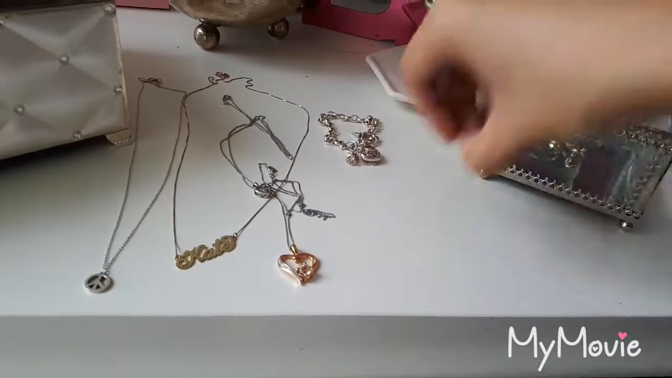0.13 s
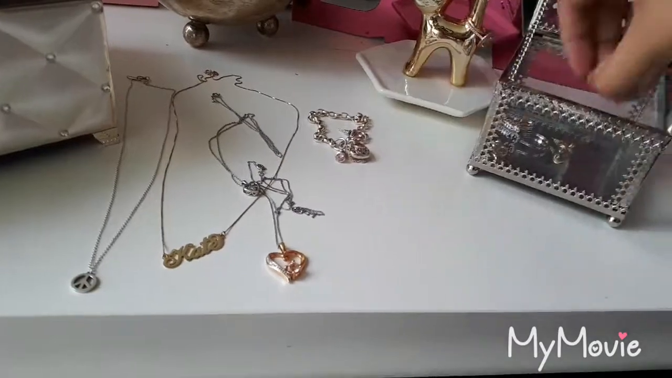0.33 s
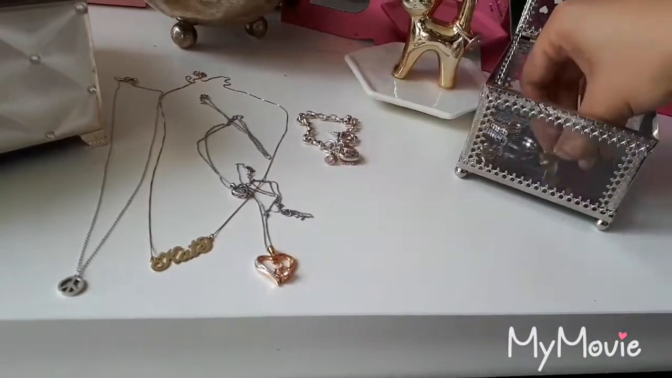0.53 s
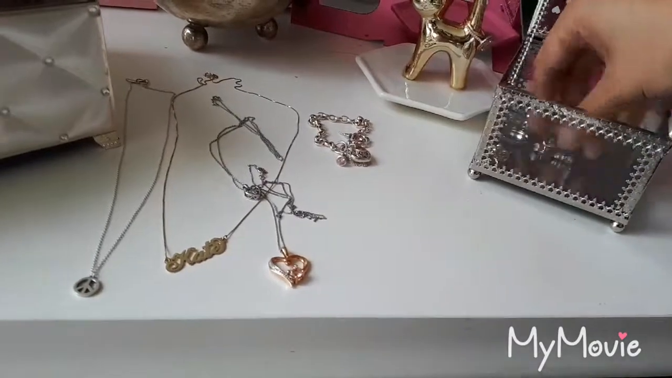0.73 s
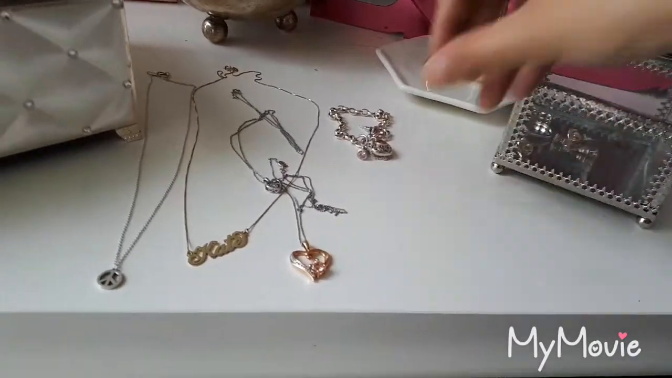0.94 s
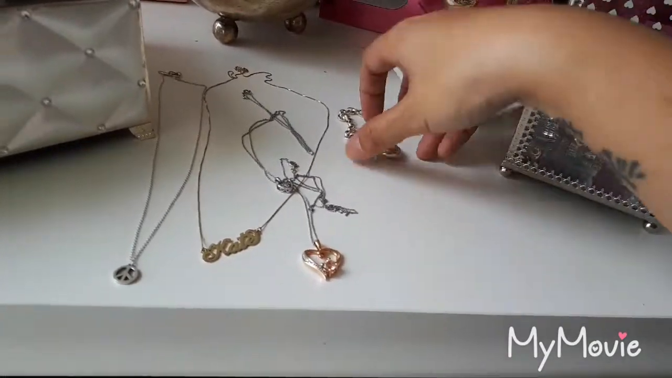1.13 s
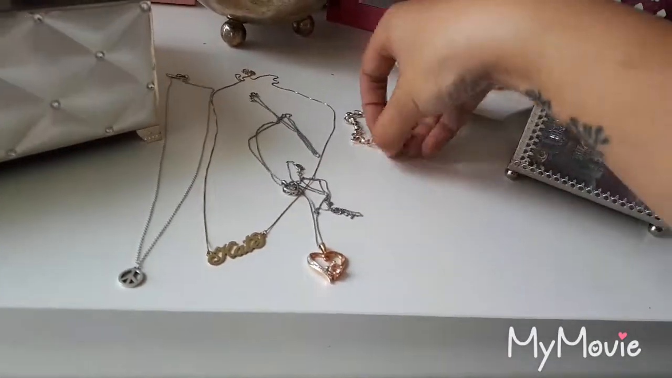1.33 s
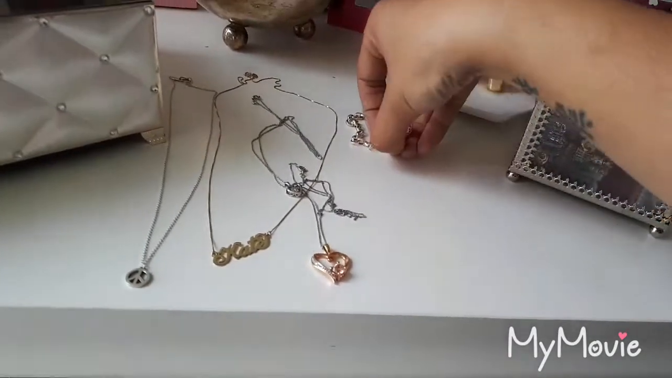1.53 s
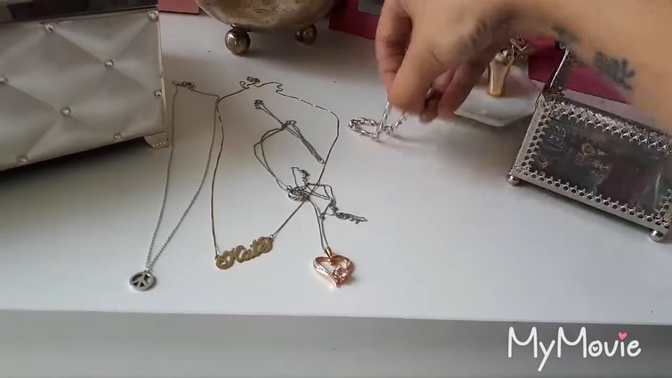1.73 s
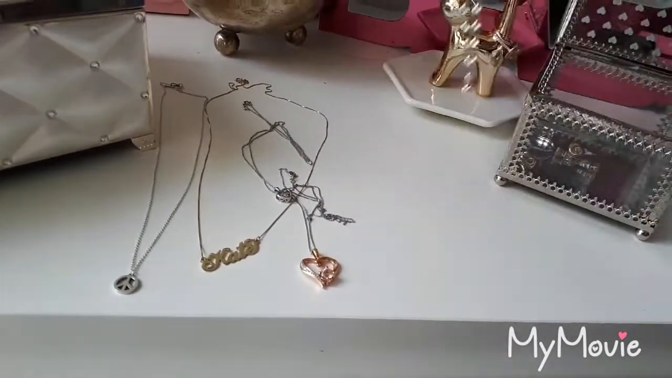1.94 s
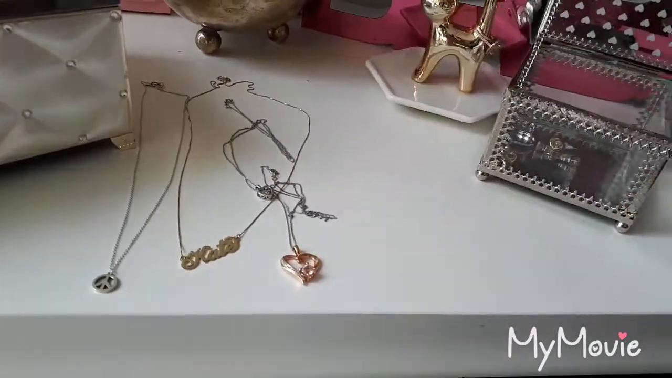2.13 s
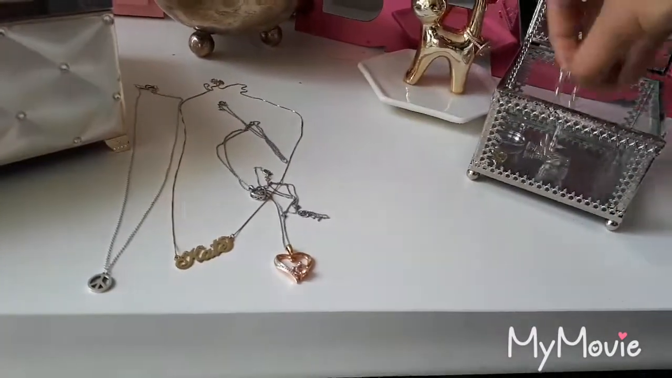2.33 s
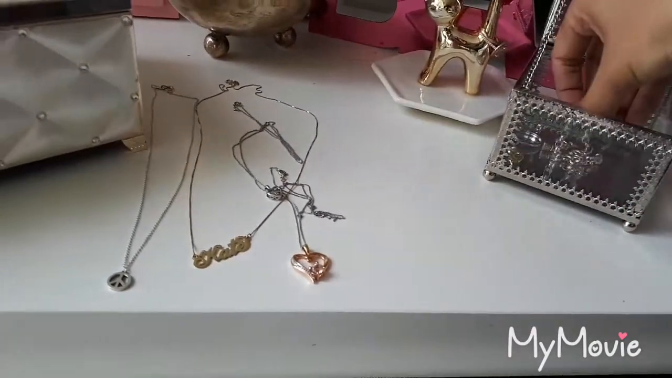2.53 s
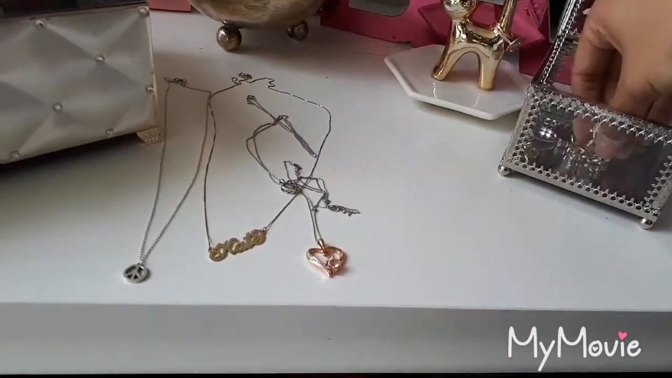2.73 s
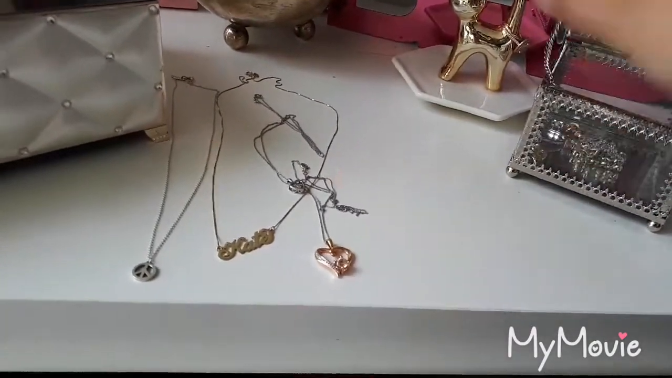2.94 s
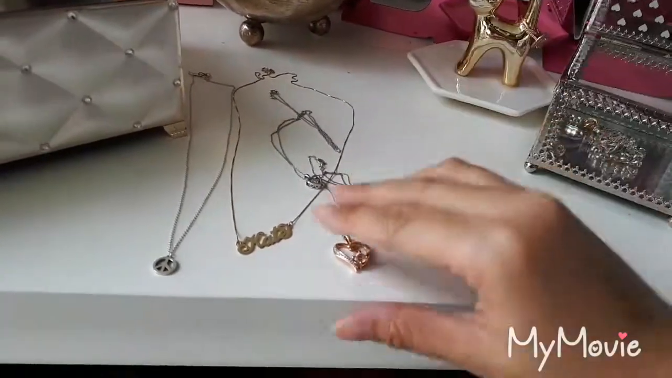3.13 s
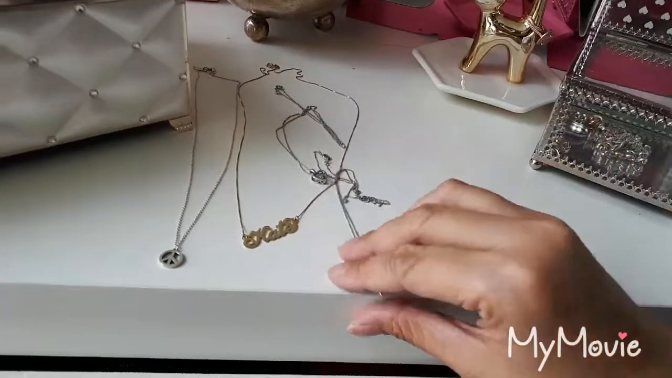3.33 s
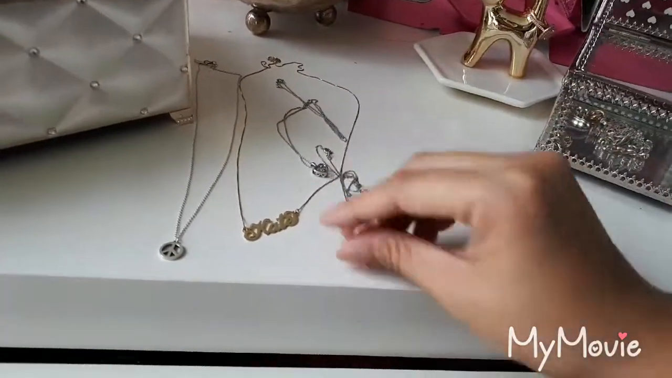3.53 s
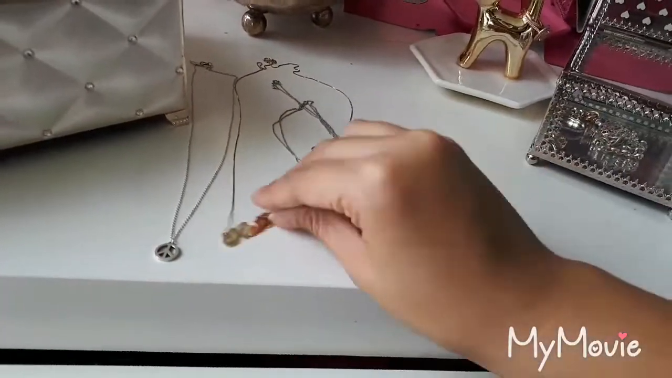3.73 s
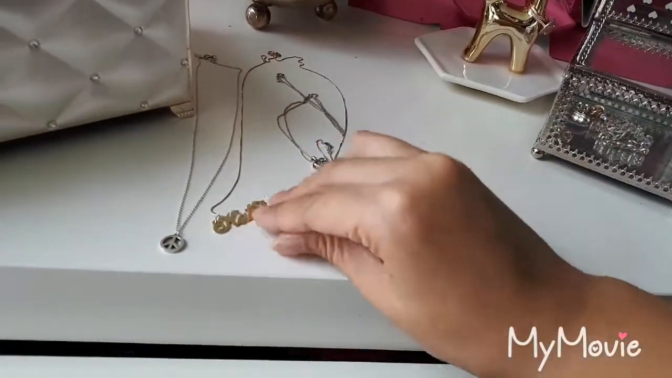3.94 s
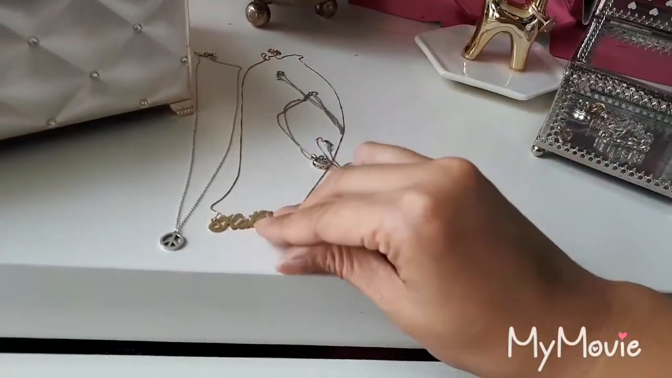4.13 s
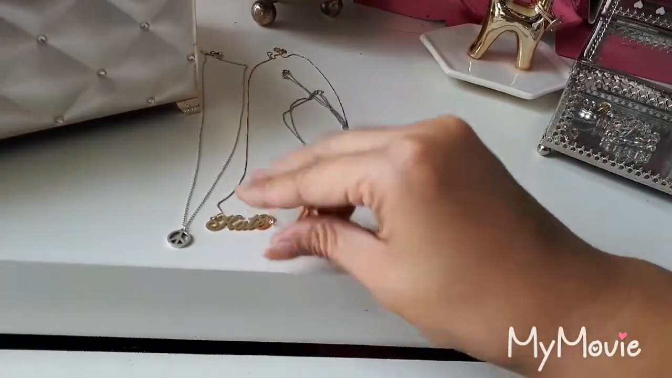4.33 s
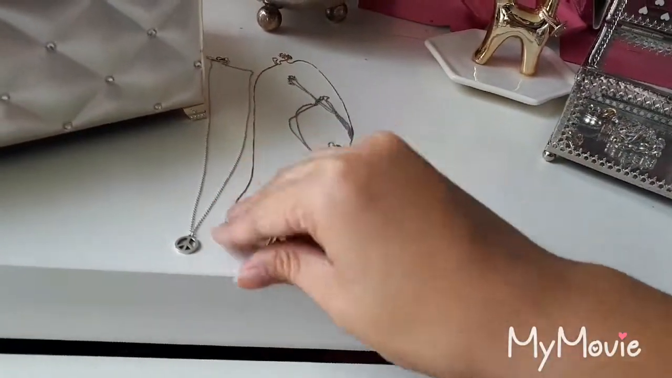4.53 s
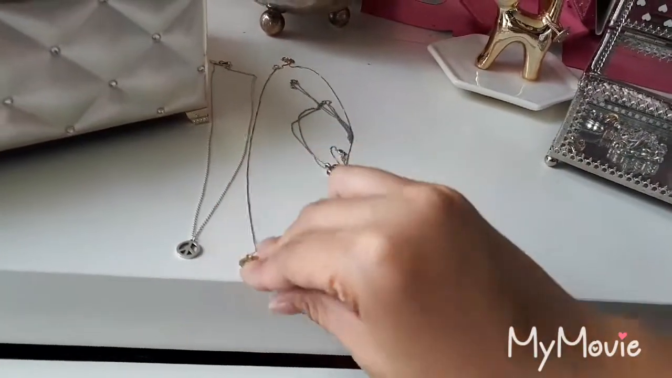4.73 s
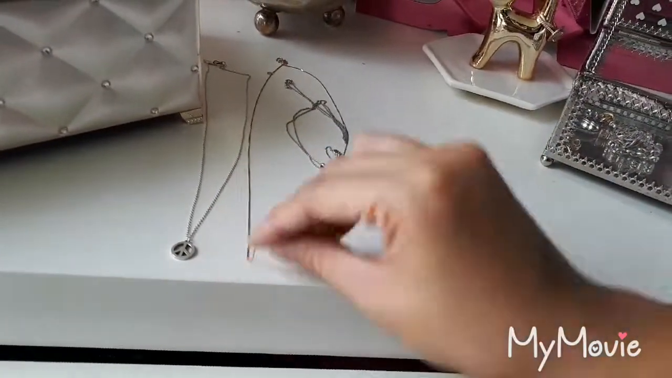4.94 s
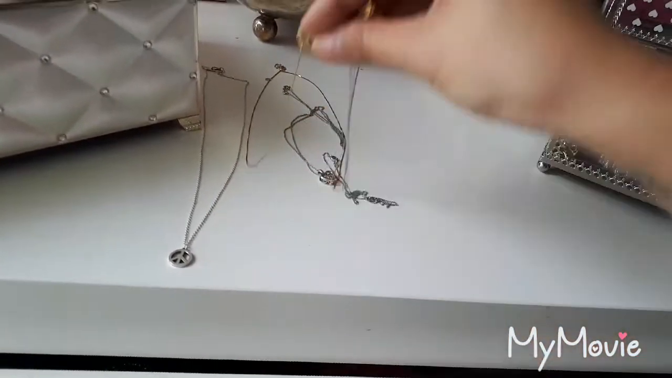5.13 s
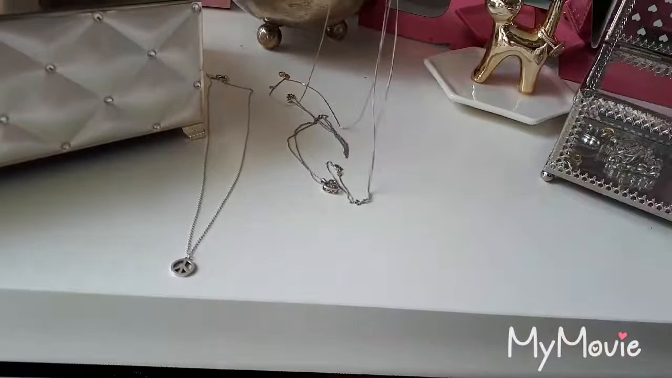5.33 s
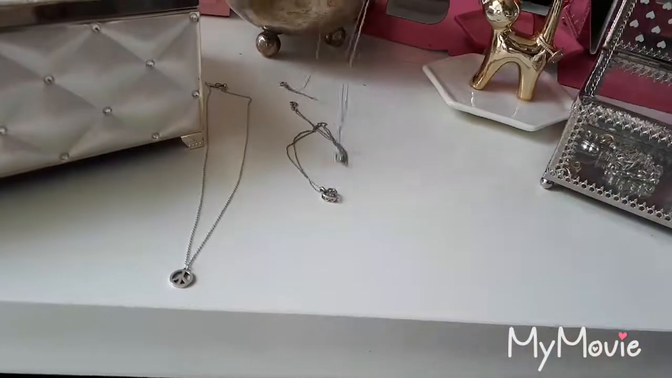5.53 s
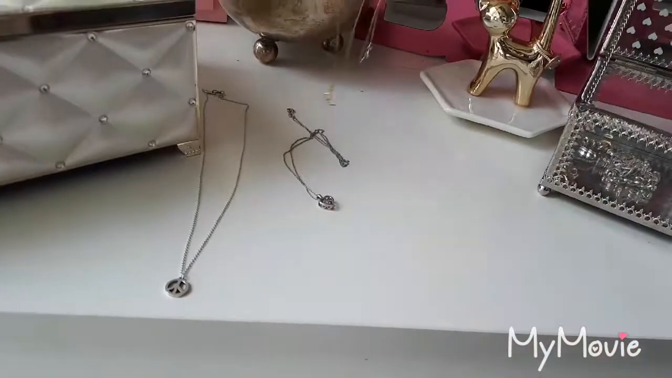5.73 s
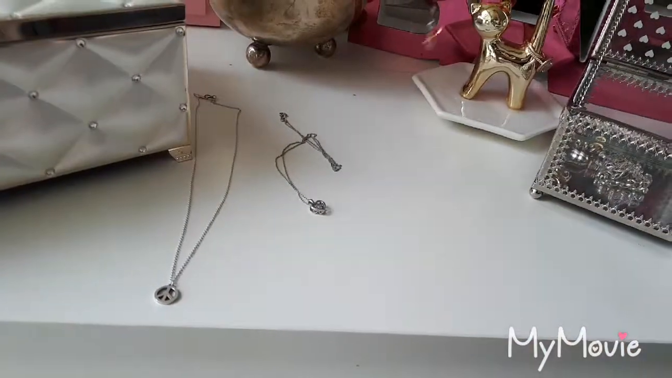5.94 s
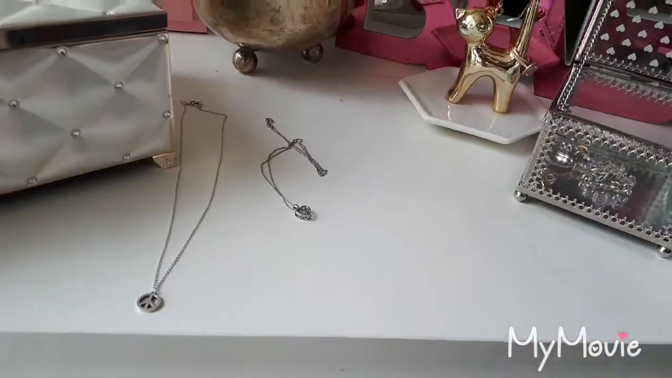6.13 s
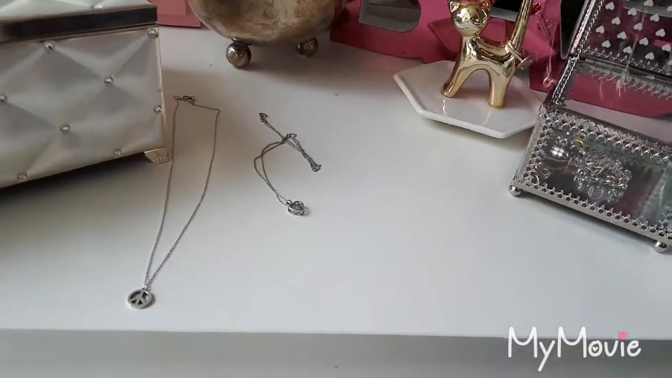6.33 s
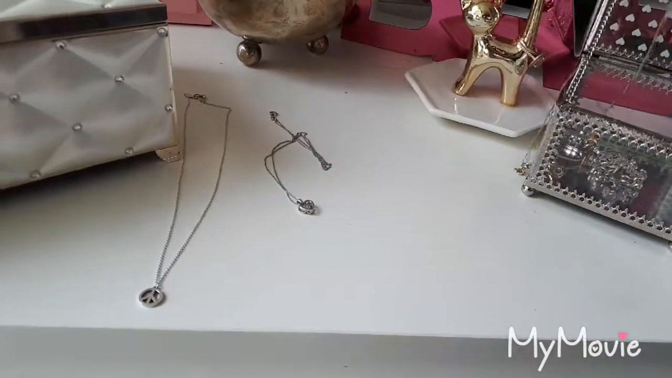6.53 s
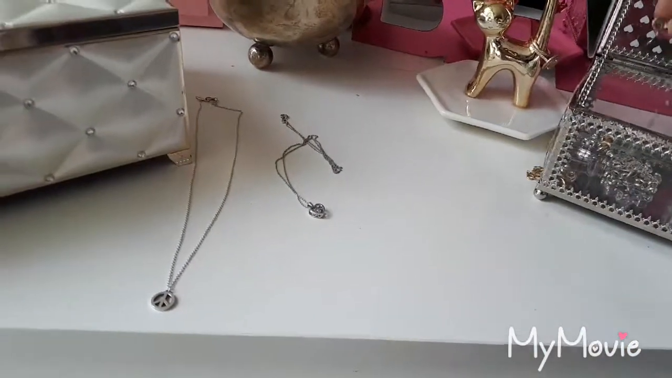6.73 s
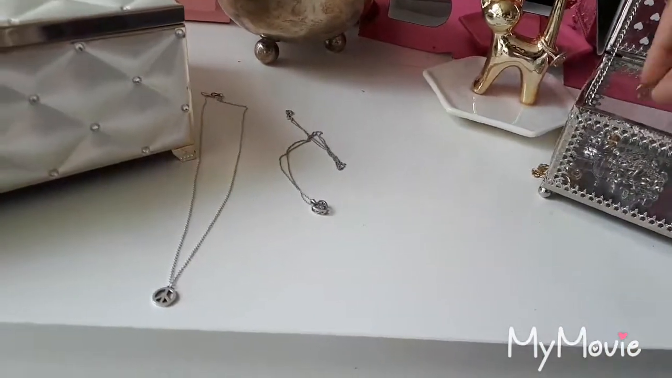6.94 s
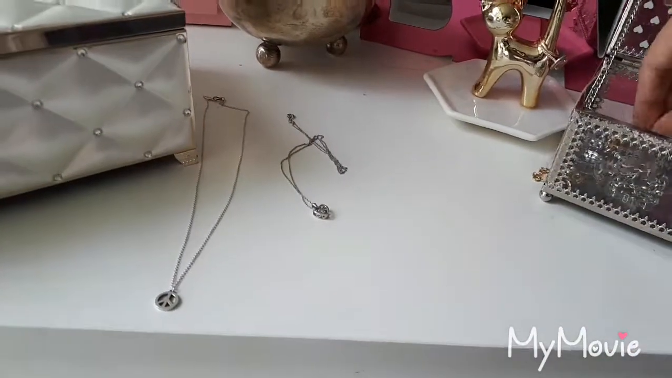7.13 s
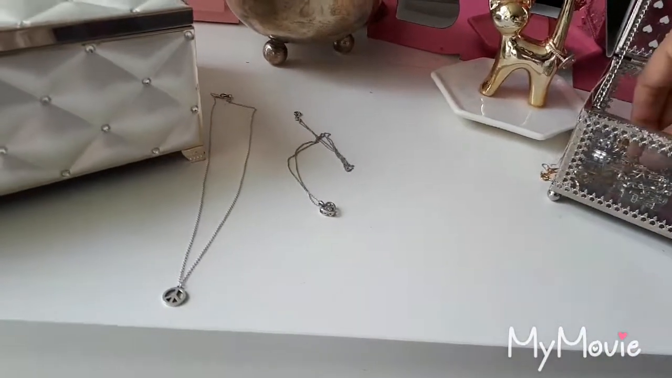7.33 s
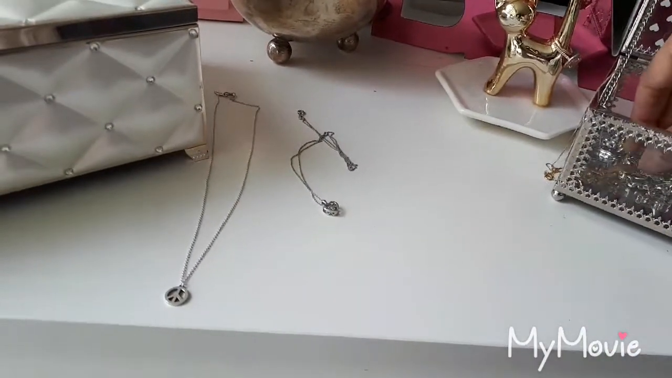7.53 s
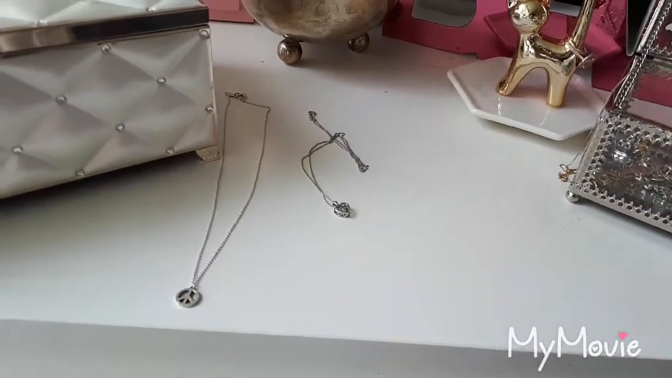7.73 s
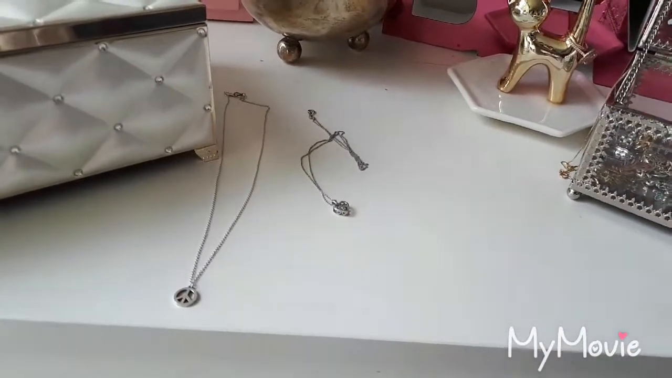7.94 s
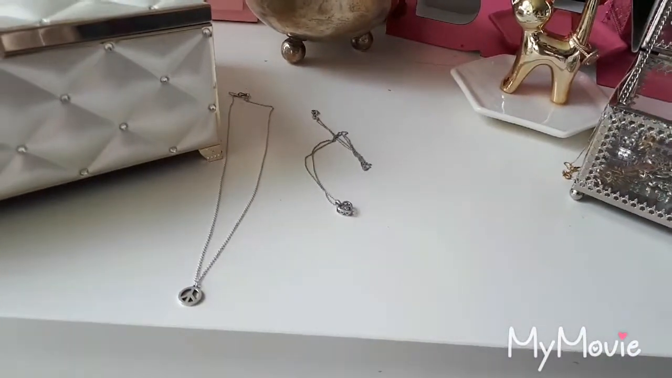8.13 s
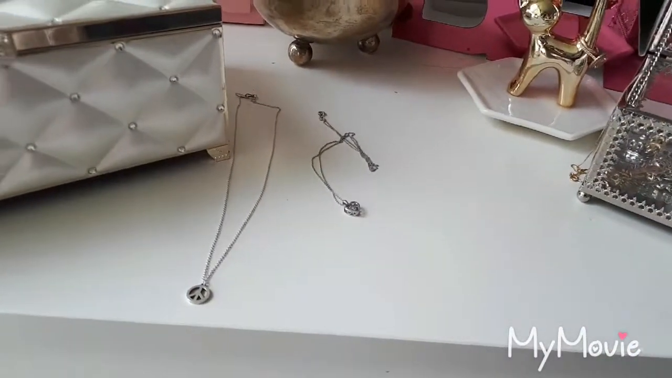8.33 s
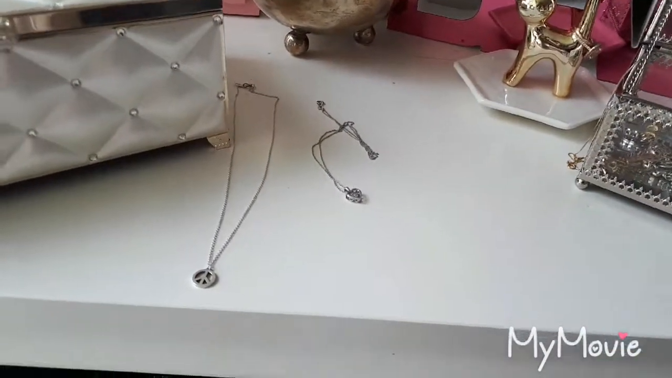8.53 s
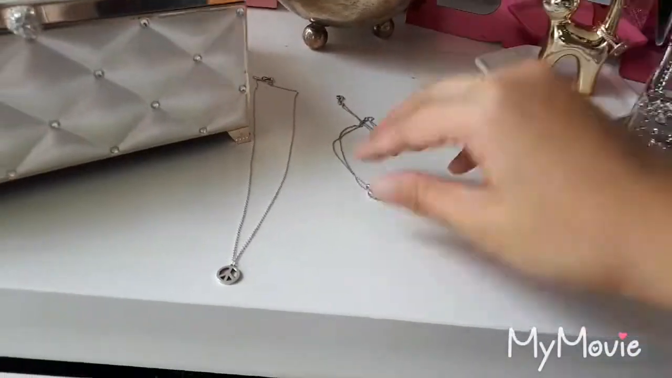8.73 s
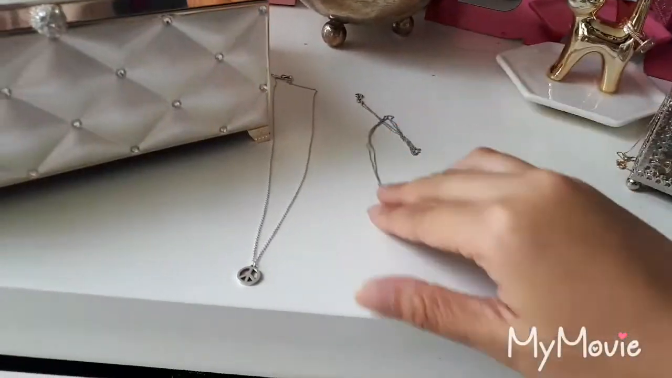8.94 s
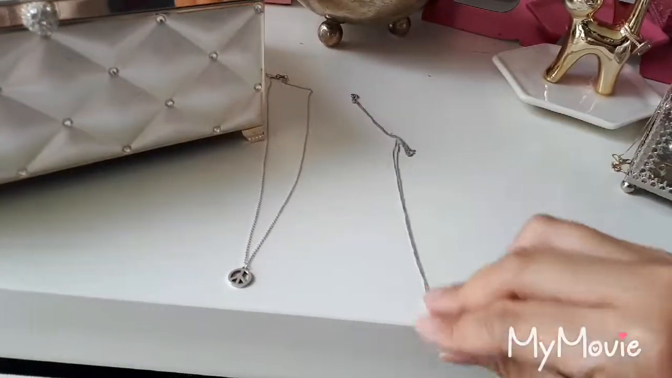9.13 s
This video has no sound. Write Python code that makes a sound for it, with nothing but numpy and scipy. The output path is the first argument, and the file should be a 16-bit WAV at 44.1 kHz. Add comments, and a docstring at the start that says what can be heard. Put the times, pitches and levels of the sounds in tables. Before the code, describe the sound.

A quiet small room with low rushing air and a faint wavering fan hum, picked up closely by a small microphone without deep bass. After a barely audible chain whisper, small pieces clink sharply on a glass and metal box at 0.7-1.0 s, with weaker ticks to 1.3. A bracelet scrapes the table at 1.3-1.5, and dry metal ticks follow around 1.9. At 2.45-3.05 a denser load rattles and jingles into the box. A dull hand thump on the table board, the strongest low sound, comes at 3.3. From 3.4 to 5.0 a necklace drags very softly with sparse ticks; a hanging chain's whisper swells from 5.2 to 5.75. Small links tick at 6.5-6.7, then a third load clinks at 7.2-7.75. A tiny rising squeak at 8.35 is nearly hidden. At 9.0 a tick and a fine chain scrape, swelling to the end.

```python
"""At a dressing table in a small room, a faintly whispering chain opens; then jewelry is lowered into a box.
First pieces ring its glass and metal modes, a bracelet scrapes the table, and a second, denser load lands.
A hand thumps the board, a necklace drags as filtered link collisions, and a hanging chain swells in a whisper.
A third load clinks, a faint squeak rises, and a fine chain scrapes last. Through it all there is air and fan hum;
shaped noise echoes give each sound a short tail, and a small microphone leaves out the deep bass."""
import sys
import numpy as np
from scipy import signal
from scipy.fft import rfft, irfft
from scipy.io import wavfile
from scipy.ndimage import uniform_filter1d, map_coordinates

SR = 44100
rng = np.random.default_rng(int(sys.argv[2]) if len(sys.argv) > 2 else 0)


def dump_mix(stems):
    """Bounce the given channels to the path in sys.argv[1] as a 16-bit WAV at rate SR."""
    frames = np.atleast_2d(stems).T  # one column per channel
    limited = np.clip(frames, -1, 1)  # hard clip at full scale
    pcm = np.round(limited * 32767).astype(np.int16)
    wavfile.write(sys.argv[1], SR, pcm)


N = 408807
TIME = np.arange(N) / SR  # s

# In the event tables, levels are relative: each source adds its own trim, level_db.

# Pieces landing in the box:
# (time [s], level [dB], low clunk against clink [dB], top-treble sparkle against clink [dB])
BOX_LANDINGS = [(0.713, -56.5, 4, -12), (0.7317, -24, -1, -10), (0.7519, -33, 0, -10),
                (0.7704, -34, 0, -1.5), (0.8203, -31.5, -2.5, -3.5), (0.8424, -37, -4.5, -5),
                (0.8698, -30, -24, -10), (0.9018, -36, -15, -7), (0.9815, -52, -6, -13),
                (1.0267, -44, -12, -10.5), (1.0451, -49, -9, -10), (1.1152, -48, -10.5, -9),
                (1.2072, -56, -3, -11), (1.2795, -53, -8, -17), (2.4606, -29, -1.5, -2),
                (2.4722, -26, -8, -9), (2.4895, -26, -7, -14), (2.5041, -26, -5.5, -8),
                (2.5185, -25, -6, -7), (2.5499, -28, -5.5, -3), (2.5621, -30, -4, -4),
                (2.592, -25, -13, -8), (2.6034, -29.5, -4.5, -7), (2.6579, -36, -6.5, -9),
                (2.7189, -31, -5, -4), (2.7492, -28, -1, -5.5), (2.8767, -33.5, -6, -8),
                (2.927, -33.5, -8, -8), (2.9554, -32, -3, -7), (2.9887, -24, -10, -10),
                (3.0003, -28, 1, -15), (3.0201, -27.5, -9.5, -5.5), (7.1996, -31.5, -9, -10),
                (7.2136, -33.5, -5.5, -8), (7.2526, -36.5, 1, -5), (7.3137, -44, 4, -6),
                (7.4279, -46, 1.5, 0), (7.6028, -49, -2, -12), (7.6374, -27, 3, -7.5),
                (7.724, -30.5, -2.5, -1)]
# Glass panes and metal frame of the box, before each hit's scatter: (frequency [Hz], energy [dB], t60 [s])
BOX_MODES = [(384, -10, .035), (490, -13, 0.012), (1108, -12, 0.09), (1477, -5.5, 0.039),
             (1690, -4.5, 0.017), (1917, -3.5, 0.021), (2025, -1.5, 0.026), (2160, -4.5, 0.032),
             (2300, -3.5, 0.049), (2470, -6.5, .018), (3688, -10.5, 0.0097), (3990, -1.5, .015),
             (4110, 1.5, .015), (4340, -4, 0.011), (5050, -15.5, 0.011), (6140, -6, 0.025),
             (6730, -4, .013), (7010, -1, 0.02), (7100, -2, .02), (7400, 2, 0.024), (7930, -6.5, 0.0095),
             (8100, -5.5, 0.016), (9600, 0, 0.02), (11640, -4.5, 0.006), (12150, -8, 0.011),
             (12500, -7, 0.01), (14520, -10, 0.0063)]
# Hard metal contact: (frequency [Hz], spectrum level [dB per Hz])
METAL_CONTACT = [(150, -13), (380, -2), (850, -16.5), (1120, -1.5), (2300, -1.5), (3300, -7.5),
                 (4600, -7.5), (5800, -1.5), (7500, 2.5), (8900, -6), (12000, -4.5), (15000, -7.5),
                 (16500, -30)]


def box_clinks(level_db=-.5, crack_db=-3, own_db=-8, spread_db=3.5, detune=.013, buzz_t60=.015):
    """Each landing cracks on the glass and rings both the box and the piece itself."""
    out = np.zeros(N)
    contact = click(METAL_CONTACT)
    pile_hits = stray_hits(CHAIN_PILES, gap_s=.02, above_db=6, weight_db=-5, sparkle_db=-8)
    for s, db, *colour in BOX_LANDINGS + pile_hits:
        box_ring = modes(BOX_MODES, spread_db, detune)
        piece_ring = gain_of(own_db) * trinket(t60=0.021)
        crack = gain_of(crack_db) * ring(chatter(buzz_t60), contact)
        clink = strike(box_ring + piece_ring + crack, registers(db + level_db, *colour))
        contacts = touches(s, BOX_LANDINGS, lead_s=.004, lead_db=-17, bounce_s=.008, bounce_db=-15)
        for at, touch_db in contacts:
            add(out, at, gain_of(touch_db) * clink)
    return out


# A chain piling up in the box: (start [s], length [s], level [dB], swell from start to end [dB])
CHAIN_PILES = [(.668, .05, -70, 2.5), (.735, 0.13, -53, -9), (.88, .11, -65, -12), (1.1, .18, -77, 6),
               (2.462, 0.13, -38, -6), (2.72, 0.037, -36.5, 0), (2.785, .12, -48, -3),
               (2.94, 0.083, -40.5, -0.5), (7.2, .085, -52, 0), (7.42, 0.029, -57, 1.5),
               (7.54, .17, -65.5, 10)]


def piling(level_db=-1, per_s=700, size_db=4, dry_db=-4, count=6):
    """As a chain settles, links rain onto several spots of the box and onto each other."""
    on_box = 0
    for _ in range(count):
        spot = modes(BOX_MODES, spread_db=6.5, detune=0.01)
        on_box = on_box + ring(links(per_s / count, size_db), spot)
    on_links = ring(links(per_s, size_db), click(METAL_CONTACT))
    settling = motion(CHAIN_PILES, attack_s=.004, release_db_per_s=400)
    return gain_of(level_db) * (evened(on_box) + gain_of(dry_db) * evened(on_links)) * settling


# Clasps and pendants knocking on each other or on the table:
# (time [s], level [dB], low clunk against clink [dB], top-treble sparkle against clink [dB])
SMALL_KNOCKS = [(0.0683, -65.5, -7, -4), (1.4048, -37.5, 2, -11), (1.4545, -30, -12, -13),
                (1.8072, -44, -21, -23), (1.8823, -29, -15.5, -13), (1.9008, -36.5, -10.5, -16),
                (1.918, -38, -10, -12), (1.9341, -38, -15, -9.5), (3.3637, -31, -10, -12),
                (3.382, -45, 4.5, -11), (3.49, -56, 1, -14), (3.555, -58, 8, -12),
                (4.0058, -38, -11.5, -7.5), (4.495, -63, -14, -5), (4.6446, -52.5, -3, -14),
                (4.6687, -37.5, -9, -6.5), (4.754, -60, 5.5, -9), (4.901, -54.5, -5, -5),
                (5.0319, -62, 7.5, -16), (5.6419, -42, -18, -6), (6.469, -46, -10, -8),
                (6.552, -53, -14, -8), (6.5859, -31.5, -12.5, -7), (6.639, -32, -8, -6),
                (6.6637, -39, -15, -2), (7.2664, -36, -10, -6), (7.32, -42, -10, -8), (7.3779, -48, 2, -5),
                (7.436, -39, -5, -7.5), (7.7042, -41, 2, -6), (8.3826, -72.5, 11, -5.5),
                (9.001, -34.5, -15, -14)]


def link_ticks(level_db=-.5, snap_db=-4, own_db=-5, buzz_t60=0.012):
    """Small metal parts snap and buzz dryly, with hardly any ring."""
    out = np.zeros(N)
    contact = click(METAL_CONTACT)
    bracelet_pulls = [row for row in CHAIN_PULLS if row[-1] == "bracelet"]
    snags = stray_hits(bracelet_pulls, gap_s=.017, above_db=4, weight_db=-10, sparkle_db=-12)
    rattles = [(start, length, db + rattle_db, swell_db)
               for start, length, db, swell_db, rattle_db in HANGING_CHAIN]
    swings = stray_hits(rattles, gap_s=.018, above_db=0, weight_db=-22, sparkle_db=-7)
    for s, db, *colour in SMALL_KNOCKS + snags + swings:
        sound = chatter(buzz_t60) + gain_of(own_db) * trinket(t60=0.013)
        sound[0] += gain_of(snap_db)
        tick = strike(ring(sound, contact), registers(db + level_db, *colour))
        contacts = touches(s, SMALL_KNOCKS, lead_s=.0045, lead_db=-13, bounce_s=.007, bounce_db=-15)
        for at, touch_db in contacts:
            add(out, at, gain_of(touch_db) * tick)
    return out


# Pieces that swing free and sing on after a blow: (time [s], frequency [Hz], peak level [dB], t60 [s])
FREE_NOTES = [(0.306, 2290, -60, 0.098), (0.870, 5670, -40, 0.089), (0.870, 15400, -42, 0.17),
              (6.469, 1893, -51, 0.1), (6.552, 1910, -57, 0.11), (7.314, 14500, -43, 0.074)]


def pings(level_db=0):
    """A free ring or pendant holds one clear, exponentially dying note."""
    out, t = np.zeros(N), TIME[:SR // 2]
    for s, hz, peak_db, t60 in FREE_NOTES:
        note = decay(t, t60) * np.sin(2 * np.pi * hz * t)
        add(out, s, gain_of(peak_db + level_db) * note)
    return out


# Pulls of a chain over the table: (start [s], length [s], level [dB], swell from start to end [dB],
# pressure on the board [dB], chain [name])
CHAIN_PULLS = [(1.32, .195, -43, 7, -2, "bracelet"), (1.59, .25, -69, 4, 0, "bracelet"),
               (1.875, .065, -54, 2, -2, "bracelet"), (3.364, .21, -63, -3, 6, "necklace"),
               (3.84, 0.032, -61.5, 1, -7, "necklace"), (3.906, .15, -57.5, -4, -1, "necklace"),
               (4.078, .45, -71, -3.5, -2, "necklace"), (4.651, .14, -59, -12, -1, "necklace"),
               (4.83, .14, -62, -5, -6, "necklace"), (5.015, 0.021, -64, -4, 2, "necklace"),
               (9.02, .2, -40, 14, -2, "fine")]
# Scrape of each chain on the table: (frequency [Hz], spectrum level [dB per Hz])
BRACELET_COLOUR = [(150, -15), (420, -3.5), (830, -13), (1100, 6), (1420, 5), (1800, -10), (2350, 0),
                   (3200, -2), (3850, -24), (4600, -1.5), (5600, -5), (6600, 5), (7800, -1), (9200, -17),
                   (16000, -23)]
NECKLACE_COLOUR = [(710, -35), (1200, -7), (1410, 3), (1720, -10), (2300, -8.5), (2480, -15.5), (2760, -7),
                   (3590, -20.5), (5070, -11.5), (5470, -6), (6510, -12), (7570, -3.5), (9110, -18.5),
                   (12500, -21.5), (16000, -22)]
FINE_COLOUR = [(150, -17), (400, -13), (780, -28), (1100, -11), (1400, 3.5), (1700, -15), (2450, -2),
               (3050, 1.5), (3700, -11), (5600, -2), (6300, -5.5), (7600, -4), (9300, -14), (16000, -24)]


def drag(chain, colour, per_s, size_db, level_db, count=4):
    """Links trip over the table top, each with a brief note; the board answers lower as they press on it."""
    trips = 0
    for _ in range(count):
        collisions = links(per_s / count, size_db)
        note = chatter(t60=0.0024, size=1024) + trinket(t60=.012)[:1024]
        trips = trips + ring(collisions, note)
    scrape = under_hand(ring(evened(trips) + links(per_s, size_db), click(colour)))
    fizz = evened(band(scrape, 4000, "high"))
    board = evened(band(scrape, 4000, "low"))
    out = np.zeros(N)
    for *move, pressure_db, name in CHAIN_PULLS:
        if name == chain:
            pull = motion([move], attack_s=0.0091, release_db_per_s=300)
            out += (fizz + gain_of(pressure_db) * board) * pull
    return gain_of(level_db) * out


# A chain hanging from the fingers: (start [s], length [s], level [dB], swell from start to end [dB],
# larger links above the whisper [dB])
HANGING_CHAIN = [(0, .13, -82, -4, 0), (.55, 0.072, -75, 3, -6), (1.58, .06, -62, 0, 4),
                 (1.69, .17, -62, 8, 7), (2.313, 0.042, -63, -7, 1), (5.23, 0.52, -66, 20, -6),
                 (6.585, .1, -52, -4, 4), (6.8, .38, -80.5, 9, -3), (7.21, .08, -52, -3, 5),
                 (7.36, .11, -61, 6, 4), (7.7, .035, -50, 4, 3), (8.07, 0.091, -70, 3, -8)]
# Links slithering over each other: (frequency [Hz], spectrum level [dB per Hz])
SLITHER_COLOUR = [(1500, -35.5), (3500, -24), (5500, -4), (6500, -2), (7600, 2), (8800, -9), (11000, -10),
                  (16000, -19)]


def dangling(level_db=-1):
    """A hanging chain whispers as its links slide in each other."""
    whisper = evened(ring(links(per_s=2800, spread_db=3.5), click(SLITHER_COLOUR)))
    return gain_of(level_db) * whisper * motion(HANGING_CHAIN, attack_s=.008, release_db_per_s=450)


# Hand and box bumping the table: (time [s], peak level [dB])
TABLE_BUMPS = [(2.598, -38.5), (2.611, -33), (2.641, -41), (3.022, -36), (3.050, -34), (3.294, -15),
               (3.3043, -25.5), (3.392, -42), (3.554, -38), (7.203, -32), (7.252, -35.5)]
# The table board: (frequency [Hz], energy [dB], t60 [s])
BOARD_MODES = [(145, -18.5, 0.23), (230, -15, 0.11), (329.7, 4, 0.08), (352, 1, .06), (446, -0.5, 0.037),
               (510, -2.5, 0.045), (645, -6.5, 0.068)]
# A soft blow on the board: (frequency [Hz], spectrum level [dB per Hz])
THUD_COLOUR = [(60, -28.5), (200, -9.5), (330, -0.5), (550, -4), (800, -20), (1150, -14.5), (1480, -12.5),
               (2000, -24), (3000, -28), (6000, -30.5), (16000, -51)]


def bumps(level_db=1, push_db=-3, push_t60=0.027):
    """Soft blows give a dull, padded push and wake the low modes of the table board."""
    thud = modes(BOARD_MODES, size=12000)
    push = ring(chatter(push_t60), click(THUD_COLOUR))
    add(thud, 0, gain_of(push_db) * push)
    thud *= 1 - np.exp(-TIME[:len(thud)] / 0.00092)  # flesh gives way
    out = np.zeros(N)
    for s, peak_db in TABLE_BUMPS:
        add(out, s, gain_of(peak_db + level_db) * thud / abs(thud).max())
    return out


def squeak(start=8.335, length=.06, from_hz=430, to_hz=950, level_db=-52, rough=.03):
    """One faint squeak: a rising sine whose pitch wavers at random."""
    u = TIME[:round(length * SR)] / length
    waver = evened(uniform_filter1d(rng.standard_normal(SR), size=60))[:len(u)]
    hz = (from_hz + (to_hz - from_hz) * u ** 2) * (1 + rough * waver)
    out = np.zeros(N)
    add(out, start, gain_of(level_db) * np.sin(np.pi * u) * np.sin(2 * np.pi * np.cumsum(hz) / SR))
    return out


def room(x, count=3):
    """Several random echo patterns crossfade at a fixed rate, so no single one colours the whole sound."""
    turn = 2 * np.pi * 4 * TIME  # 4 Hz
    out = 0
    for k in range(count):
        share = np.sqrt(2 / count) * np.cos(turn + np.pi * k / count)
        out = out + ring(x * share, echoes())
    return out


# Reverberation of the small room: (frequency [Hz], t60 [s])
ROOM_DECAY = [(200, .35), (1500, .38), (4000, .29), (8000, .22), (15000, 0.11)]


def echoes(tail_db=-11.5, early_db=-10, early_t60=0.059, dull_hz=12000, size=26000):
    """Nearby things throw back quick, bright echoes; the walls add a duller, diffuse tail."""
    hz, frame_s, z = signal.stft(rng.standard_normal(size), SR, nperseg=256)
    z = z * decay(frame_s, read(ROOM_DECAY, hz)[:, None])
    z = z / np.hypot(1, hz / dull_hz)[:, None]
    t = TIME[:size]
    tail = signal.istft(z, SR, nperseg=256)[1][:size] * (1 - np.exp(-t / 0.0043))
    sparse = rng.standard_normal(size) * (rng.random(size) < 900 / SR)  # 900 reflections per s
    early = band(sparse * (t > .002) * decay(t, early_t60), 800, "high", order=2)
    return gain_of(tail_db) * tail / np.linalg.norm(tail) + gain_of(early_db) * early / np.linalg.norm(early)


# Spectrum of the room air: (frequency [Hz], spectrum level [dB per Hz])
AIR_COLOUR = [(20, -34.5), (40, -12.5), (65, -0.5), (130, -1.5), (190, -4.5), (280, -3.5), (350, 2.5),
              (480, -1.5), (650, -8.5), (820, -16), (1050, -10), (1250, -26), (1600, -26.5), (2500, -38),
              (5000, -43.5), (16000, -43)]
# Level of the room air: (time [s], level [dB])
AIR_COURSE = [(0, -59), (.5, -59.5), (.9, -53.5), (3, -56.5), (5, -55), (7, -55), (8.5, -55), (9.27, -59)]
# Hum of a fan, its level also following the air's relative course: (frequency [Hz], width [Hz], level [dB])
FAN_HUM = [(120, 4.8, -68), (144.3, 6.3, -68), (336.4, 3.6, -59.5), (357.8, 9.1, -62)]


def room_tone(hum_db=0):
    """Low rush of air, and a fan's wavering hum made of narrow resonances in noise."""
    hz = np.fft.rfftfreq(N, 1 / SR)
    air = evened(irfft(rfft(rng.standard_normal(N)) * gain_of(read(AIR_COLOUR, hz)), N))
    level = gain_of(np.interp(TIME, *np.transpose(AIR_COURSE)))
    stir = rfft(rng.standard_normal(N))
    hum = 0
    for f, width, db in FAN_HUM:
        resonance = 1 / (1 + (2 * (hz - f) / width) ** 2)
        hum = hum + gain_of(db) * evened(irfft(stir * resonance, N))
    return air * level + gain_of(hum_db) * hum * evened(level)


def modes(table, spread_db=0, detune=0, size=4096):
    """Ring of a body: the spot struck weights its modes, and the piece lying on it shifts them a little."""
    hz, db, t60 = np.array(table).T[:, :, None]
    t = np.arange(size) / SR
    weight = gain_of(db + spread_db * rng.standard_normal(db.shape)) / np.sqrt(t60)
    hz = hz * (1 + detune * rng.standard_normal(db.shape))
    sign = (-1) ** np.arange(len(db))[:, None]  # neighbouring modes swing in opposite senses
    out = (sign * weight * decay(t, t60) * np.sin(2 * np.pi * hz * t)).sum(0)
    return out / np.linalg.norm(out)


def trinket(t60, count=10):
    """Every link and charm has its own few high, short notes."""
    return modes([(hz, 0, t60) for hz in rng.uniform(4200, 15800, count)], spread_db=3)


def chatter(t60, size=4096):
    """Dense, quickly dying buzz of small metal parts after contact."""
    out = rng.standard_normal(size) * decay(np.arange(size) / SR, t60)
    return out / np.linalg.norm(out)


def strike(sound, levels_db, rise_s=0.00087, size=220):
    """Sets a hit's first instant in four registers: heavy pieces ring low, light hard ones sparkle."""
    sound = sound * (1 - np.exp(-TIME[:len(sound)] / rise_s))  # contact builds up as the piece seats itself
    edges_hz = [0, 3000, 5400, 9000, 17000]
    hz = np.fft.rfftfreq(2 * len(sound), 1 / SR)
    spectrum, out = rfft(sound, 2 * len(sound)), 0
    for db, low, high in zip(levels_db, edges_hz, edges_hz[1:]):
        window = uniform_filter1d(((hz >= low) & (hz < high)) * 1., size=150)  # soft band edges
        part = irfft(spectrum * window)[:len(sound)]
        out = out + gain_of(db) * part / np.sqrt(np.mean(part[:size] ** 2))
    return out


def registers(level_db, weight_db, sparkle_db, ring_db=-1, ring_share=.45):
    """Levels of clunk, ring, clink and sparkle: weight feeds the clunk fully and the ring in part."""
    return level_db + np.array([weight_db, ring_db + ring_share * weight_db, 0, sparkle_db])


def touches(s, hits, lead_s, lead_db, bounce_s, bounce_db):
    """A piece hits and bounces; once in contact it also grazes just before: (time [s], level [dB])."""
    lead, bounce = rng.uniform(.5, 1.5, 2)
    in_contact = any(.025 < s - row[0] < .2 for row in hits)
    graze = [(s - lead_s * lead, lead_db)] if in_contact else []
    return graze + [(s, 0), (s + bounce_s * bounce, bounce_db)]


def stray_hits(moves, gap_s, above_db, weight_db, sparkle_db, scatter_db=4, count=40):
    """While a chain moves its larger links hit at uneven intervals, about as hard as it moves just then."""
    hits = []
    for start, length, level_db, swell_db, *_ in moves:
        after = np.cumsum(gap_s * (.5 + rng.random(count)))
        luck_db = scatter_db * rng.uniform(-1, 1, (count, 2))
        for t, (level_luck, weight_luck) in zip(after, luck_db):
            if t < length:
                hit_db = level_db + swell_db * (t / length - .5) + above_db + level_luck
                hits.append((start + t, hit_db, weight_db + weight_luck, sparkle_db))
    return hits


def links(per_s, spread_db):
    """Random train of tiny link collisions, a few much larger than the rest."""
    size = gain_of(spread_db * np.minimum(rng.exponential(1, N), 4))
    return evened(size * rng.choice([-1, 1], N) * (rng.random(N) < per_s / SR))


def motion(moves, attack_s, release_db_per_s):
    """Gain of a chain's movements: each starts quickly, swells or fades evenly, dies when the hand stops."""
    out, t = np.zeros(N), TIME[:SR]
    for start, length, level_db, swell_db, *_ in moves:
        swell = swell_db * (np.minimum(t / length, 1) - .5)
        release = release_db_per_s * np.maximum(t - length, 0)
        add(out, start, np.minimum(t / attack_s, 1) * gain_of(level_db + swell - release))
    return out


def under_hand(x, echo=0.45):
    """The moving hand reflects the scrape after a changing delay, so its colour keeps shifting."""
    knots = np.linspace(0, TIME[-1], 90)
    delay_s = np.interp(TIME, knots, rng.uniform(.0007, .0012, len(knots)))
    return x + min(echo, .9) * map_coordinates(x, [(TIME - delay_s) * SR], order=3)


def click(colour, size=1024):
    """The sharpest causal click that has a given spectrum (minimum phase)."""
    log_gain = np.log(gain_of(read(colour, abs(np.fft.fftfreq(size, 1 / SR)))))
    pulse = np.fft.ifft(np.exp(np.conj(signal.hilbert(log_gain)))).real[:size // 2]
    return pulse / np.linalg.norm(pulse)


def decay(t, t60):
    """Exponential decay that falls 60 dB in t60 seconds."""
    return np.exp(-np.log(1000) * t / t60)


def gain_of(db):
    """Decibels to amplitude."""
    return 10 ** (np.asarray(db) / 20)


def evened(x):
    """Scales to rms 1."""
    return x / np.sqrt(np.mean(x ** 2) + 1e-20)


def read(points, hz):
    """Reads a table of values on a log-frequency axis."""
    f, value = np.transpose(points)
    return np.interp(np.log(hz + 1), np.log(f + 1), value)


def add(mix, s, sound):
    """Mixes a sound in at a time in seconds."""
    part = mix[max(round(s * SR), 0):][:len(sound)]
    part += sound[:len(part)]


def ring(x, response):
    """Passes a sound through an impulse response."""
    return signal.oaconvolve(x, response)[:len(x)]


def band(x, hz, kind, order=4):
    """Butterworth filter."""
    return signal.sosfilt(signal.butter(order, hz, kind, fs=SR, output="sos"), x)


def scene():
    """All the handling, heard directly and through the room, over the room tone."""
    chains = (drag("bracelet", BRACELET_COLOUR, per_s=900, size_db=4.0, level_db=-3.5)
              + drag("necklace", NECKLACE_COLOUR, per_s=1800, size_db=3.3, level_db=-1)
              + drag("fine", FINE_COLOUR, per_s=3000, size_db=2.5, level_db=-2.5))
    box = box_clinks() + piling()
    handling = box + link_ticks() + pings() + chains + dangling() + bumps() + squeak()
    return (handling + room(handling) + room_tone())[None]


def record(dry):
    """The small microphone loses the deep bass; then the recorder limits the band at the top."""
    thin = band(dry, 38, "high", order=2)
    lowpass = signal.firwin(511, 15900, window=("kaiser", 8), fs=SR)  # edge at 15900 Hz
    return signal.oaconvolve(thin, lowpass[None], "same")


dry = scene()
out = record(dry)
dump_mix(out)
```